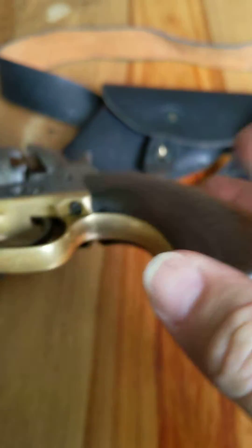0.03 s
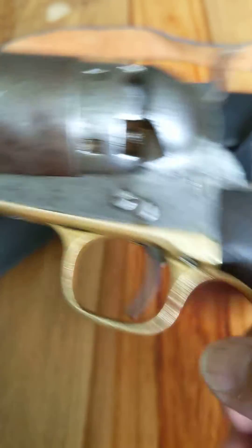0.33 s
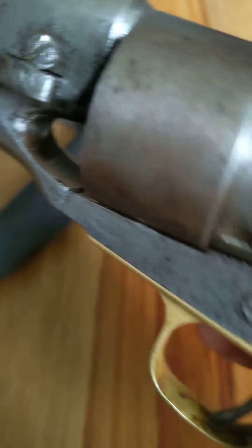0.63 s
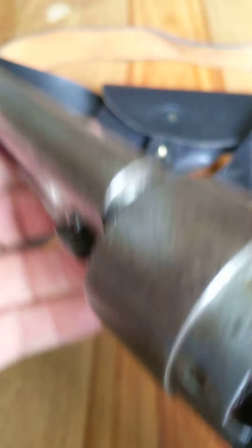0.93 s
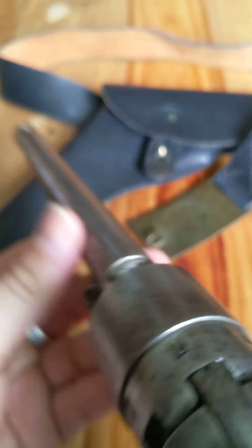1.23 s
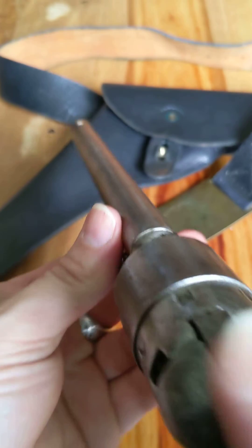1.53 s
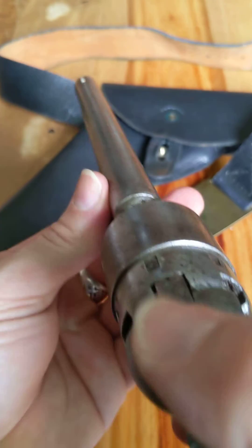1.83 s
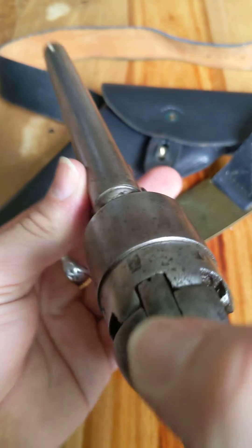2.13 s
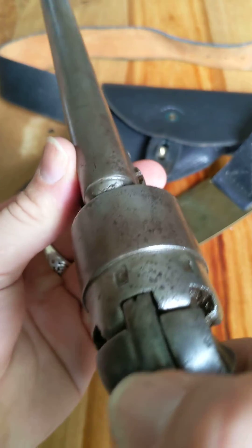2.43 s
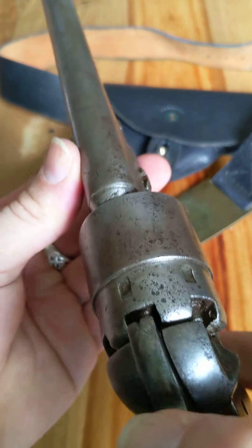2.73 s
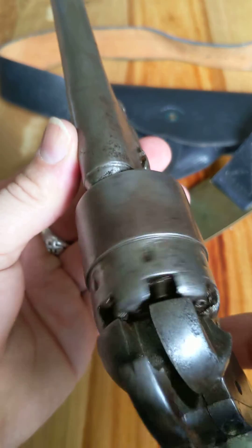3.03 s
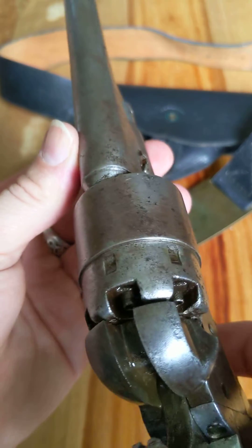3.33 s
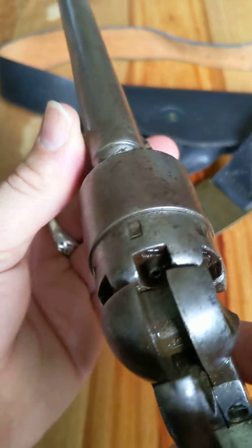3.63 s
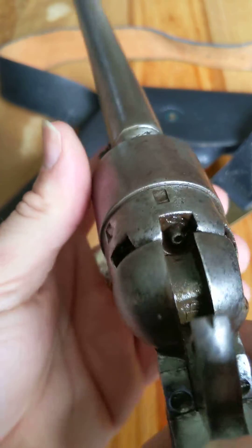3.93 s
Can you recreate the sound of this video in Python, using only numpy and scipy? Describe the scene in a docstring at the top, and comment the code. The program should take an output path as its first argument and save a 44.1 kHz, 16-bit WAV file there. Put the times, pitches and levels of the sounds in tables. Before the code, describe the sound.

Revolver hammer being cocked with sharp metallic clicks, after soft handling taps.

```python
"""A revolver handled in a small room, a hand's width from a phone's stereo microphone.
Over hum and hiss, skin slides on steel and fingers tap the frame. From 0.7 s a faint, far tick comes
once a second. Light clicks at 0.8 s and more taps follow as the gun is turned over. From about 3 s
it is cocked: the lock snaps through its notches, each contact ringing the hand-damped steel for a
few milliseconds, and the room answers."""
import sys
import numpy as np
from scipy import signal
from scipy.fft import rfft, irfft
from scipy.io import wavfile

SR = 44100
rng = np.random.default_rng(int(sys.argv[2]) if len(sys.argv) > 2 else 0)


def transcribe(signal):
    """Save signal, clipped to [-1, 1], as a 16-bit WAV file at the path in sys.argv[1]."""
    frames = np.atleast_2d(signal).T
    limited = np.clip(frames, -1, 1)
    pcm = np.round(limited * 32767).astype(np.int16)
    wavfile.write(sys.argv[1], SR, pcm)


N = 176400

# room rumble and microphone hiss (frequency [Hz], relative level [dB])
FLOOR_COLOUR = [(12, -38.5), (20, 1.5), (42, -9), (74, -7.5), (153, -13), (185, -14.5), (245, -18.5),
                (274, -15.5), (362, -20), (393, -24), (439, -18), (958, -22.5), (2400, -26.5), (2920, -27),
                (15500, -40)]
# hum in the room (frequency [Hz], level [dB])
HUM_TONES = [(71, -78), (238, -82)]
# skin sliding on steel (time [s], level [dB])
SLIDE_LEVELS = [(0, -83.5), (.24, -75), (.39, -65), (.43, -67), (.47, -59.5), (.5, -70), (.56, -60),
                (.62, -67.5), (.68, -61.5), (.73, -69), (.9, -59.5), (.99, -67.5), (1.15, -66.5),
                (1.4, -70), (1.6, -69), (2.0, -76.5), (2.18, -73), (2.7, -77.5), (4, -75)]
# its spectrum (frequency [Hz], relative level [dB])
SLIDE_COLOUR = [(300, -13.5), (1200, -9.5), (3000, -3.5), (5000, -4), (7500, -10.5), (10500, -1),
                (14500, -1.5), (16000, -9)]
# the palm shifting on the grip (peak time [s], length [s], centre [Hz], level [dB])
PALM_SHIFTS = [(0.38, 0.14, 2400, -73.5), (.615, 0.04, 270, -65.5), (0.891, 0.17, 2030, -69),
               (1.11, 0.19, 15, -55.5), (1.28, 0.1, 22, -61.5), (2.926, 0.17, 370, -76)]
# a dull knock on the held gun (frequency [Hz], relative level [dB], t60 [s])
KNOCK_MODES = [(360, 1.5, 0.011), (606, -3.5, .007), (1400, -4.5, 0.0038), (1940, 1, 0.004)]
# limits of the four tap bands (frequency [Hz])
TAP_EDGES_HZ = [100, 700, 1900, 3300, 7500]
# fingers on frame and grip (time [s], 4 band levels before trim [dB], pan left [dB], left lag [s])
FINGER_TAPS = [(0.0231, -69, -72.5, -78, -80, 2, 0), (0.038, -59, -114, -91.5, -90, -2, 0),
               (1.1408, -50.5, -53, -59.5, -69, -9, 0.000021), (1.2263, -59.5, -55, -66, -81, -3, .0004),
               (1.2664, -60, -54.5, -68.5, -77, -4, .0004), (1.282, -62.5, -59.5, -69.5, -75, -7, .0004),
               (1.353, -59.5, -56, -64, -84, -4, .0004), (2.373, -77, -82, -68, -80, -5, 0),
               (3.179, -65, -48, -50.5, -62, 7.5, -.0002)]
# spectrum of the room's tail (frequency [Hz], gain [dB])
ROOM_COLOUR = [(150, -3), (1200, -0.5), (2000, -4), (2700, 2.5), (3500, -4.5), (4700, -2.5), (7000, -7),
               (11000, -5), (16000, -13.5)]
# first reflections off table and body (delay [s], gain [dB])
REFLECTIONS = [(.0095, -22.5), (0.0179, -23.5)]
# resonances of the far tick (frequency [Hz], width [Hz], relative level [dB])
TICK_MODES = [(948, 90, -2.5), (1400, 320, -0.5), (2800, 1300, -3.5)]
# limits of the seven click bands (frequency [Hz])
CLICK_EDGES_HZ = [100, 700, 1900, 3300, 5300, 7500, 11000, 16000]
# metal contacts in the lock
# (time [s], 7 band levels before trim [dB], pan left [dB], left lag [s], favoured mode [Hz])
LOCK_CONTACTS = [(0.7709, -73, -69, -68.5, -60.5, -71, -70, -72, -6, -0.0024, 3850),
                 (0.8098, -75, -60, -59, -65, -57, -63, -67, -13, .0002, 5890),
                 (0.8178, -60.5, -56, -51.5, -47, -46, -45.5, -48.5, 0, 0.000024, 6500),
                 (2.2965, -91, -86, -104, -81.5, -82, -71.5, -73, -8, 0, 11400),
                 (2.9778, -84, -86, -72, -71.5, -65.5, -64.5, -73, -4.5, 0, 6770),
                 (3.0786, -55, -39.5, -34, -25.5, -33, -26.5, -21, -1.5, -.0003, 4650),
                 (3.268, -50.5, -49.5, -33, -31.5, -30.5, -20.5, -22, -7, -.0001, 2820),
                 (3.333, -48, -43, -32.5, -33, -26.5, -30, -23, -4.5, .0002, 2310),
                 (3.381, -57.5, -57.5, -49, -40, -54, -45, -46.5, -2.5, .0001, 4510),
                 (3.5762, -50, -55, -46, -36.5, -36.5, -31, -37.5, -3.5, .0001, 8060)]
# the hand-damped steel (frequency [Hz], relative level [dB], t60 [s])
STEEL_MODES = [(1080, -0.5, .011), (2310, -10, 0.02), (2820, -13, 0.016), (3850, -12.5, 0.0076),
               (4510, -1.5, 0.0093), (5110, 4.5, .009), (5890, 0.5, .014), (6770, -6, 0.012),
               (8270, -0.5, 0.0077), (9420, 7, 0.0073), (10170, 13.5, 0.0068), (11420, 7, 0.0083),
               (11940, 1, 0.0061), (12600, -6, 0.0095), (15500, -4, .011)]
# how the two microphone ports hear the steel (frequency [Hz], extra pan left [dB])
PORT_TILT = [(200, 9), (1200, 2.5), (2500, 8.5), (5500, 6), (8500, 3), (12000, -1), (16000, -3.5)]


def undb(db):
    """Decibels to gain."""
    return 10 ** (np.asarray(db) / 20)


def unit(x):
    """Scale to rms 1."""
    return x / np.sqrt(np.mean(x ** 2, axis=-1, keepdims=True) + 1e-30)


def decay(t, t60):
    """Fall by 60 dB in t60 seconds."""
    return np.exp(-np.log(1000) * t / t60)


def pan(db):
    """Stereo gains of constant total power, the left db above the right."""
    gains = undb(np.array([np.atleast_1d(db), -np.atleast_1d(db)]) / 2)
    return gains / np.sqrt(np.mean(gains ** 2, axis=0))


def freqs(size):
    """Bin frequencies in Hz, at least 1."""
    return np.maximum(np.arange(size // 2 + 1) * SR / size, 1)


def along(hz, points):
    """Read (Hz, value) points on a log-frequency axis."""
    f, values = np.array(points, float).T
    return np.interp(np.log(hz), np.log(f), values)


def colour(x, points):
    """Filter by (Hz, dB) points."""
    size = x.shape[-1]
    return irfft(rfft(x) * undb(along(freqs(size), points)), size)


def noise_band(hz, width):
    """Stereo noise in one steep resonance."""
    f = freqs(N)
    noise = rfft(rng.standard_normal((2, N)))
    return unit(irfft(noise / (1 + ((f * f - hz * hz) / (f * width)) ** 2), N))


def drift(rate_hz):
    """Smooth random wander of rms 1."""
    return unit(irfft(rfft(rng.standard_normal(N)) / (1 + (freqs(N) / rate_hz) ** 4), N))


def shape_bands(x, edges, band_db):
    """Bring a blow near its band levels, taken over 10 ms, and roll off the bass."""
    size = x.shape[-1]
    f, spectrum = freqs(size), rfft(x)
    centres = np.sqrt(np.array(edges[:-1]) * np.array(edges[1:]))
    bands = [(f >= low) & (f < high) for low, high in zip(edges, edges[1:])]
    for _ in range(2):
        power = np.mean(abs(spectrum) ** 2, axis=0)
        energy = np.array([2 * power[band].sum() / size for band in bands])
        band_rms = np.sqrt(energy / (SR / 100))
        cepstrum = irfft(np.interp(np.log(f), np.log(centres), np.log(undb(band_db) / band_rms)))
        cepstrum[1:size // 2] *= 2  # minimum phase: nothing rings ahead of the blow
        cepstrum[size // 2 + 1:] = 0
        spectrum = spectrum * np.exp(rfft(cepstrum)) / (1 + edges[0] / (2j * f))
    return irfft(spectrum)


def at_microphone(x, lag, pan_db):
    """A close sound reaches the two ports at different times and levels."""
    delay = np.exp(1j * np.pi * freqs(x.shape[-1]) * lag * np.array([[-1], [1]]))
    return irfft(rfft(x) * pan(pan_db) * delay)


def add(out, x, start):
    """Mix a short sound in at start seconds."""
    i = int(round(start * SR))
    a, b = max(i, 0), min(i + x.shape[-1], N)
    out[:, a:b] += x[:, a - i:b - i]


def room_tone(floor_db=-68.5, shared_below_hz=450):
    """Rumble largely common to both ports, separate microphone hiss and a wavering hum."""
    t = np.arange(N) / SR
    shared = 0.78 / (1 + (freqs(N) / shared_below_hz) ** 2)
    common = rfft(rng.standard_normal(N)) * np.sqrt(shared)
    separate = rfft(rng.standard_normal((2, N))) * np.sqrt(1 - shared)
    out = unit(colour(irfft(common + separate, N), FLOOR_COLOUR)) * undb(floor_db)
    for hz, db in HUM_TONES:
        tone = np.sin(2 * np.pi * hz * t + 2.2 * drift(1.3))
        out += undb(db) * unit(tone * undb(3.9 * drift(4)))
    return out


def sliding_hands(grain_db=1, pan_db=-5):
    """Close up and to the right, skin hisses over steel; the palm shifts in soft swells."""
    t = np.arange(N) / SR
    slide_db = np.interp(t, *np.array(SLIDE_LEVELS).T) + grain_db * drift(40)
    out = unit(colour(rng.standard_normal((2, N)), SLIDE_COLOUR)) * undb(slide_db) * pan(pan_db)
    for middle, length, hz, db in PALM_SHIFTS:
        swell = np.exp(-2 * ((t - middle) / length) ** 2)
        out += noise_band(hz, hz * 0.77) * undb(db) * swell
    return out


def finger_taps(thud_rise_s=0.00082, trim_db=-2.5, size=4096, lead=128):
    """A fingertip rings a few quickly damped modes; the low thud builds last."""
    out = np.zeros((2, N))
    age = np.maximum(np.arange(size) - lead, 0) / SR
    knock = 0
    for hz, db, t60 in KNOCK_MODES:
        rise_s = thud_rise_s * KNOCK_MODES[0][0] / hz
        build = 1 - np.exp(-age / rise_s)
        knock += undb(db) * build * np.sin(2 * np.pi * hz * age) * decay(age, t60)
    for start, *band_db, pan_db, lag in FINGER_TAPS:
        tap = at_microphone(knock, lag, pan_db)
        tap = shape_bands(tap, TAP_EDGES_HZ, np.array(band_db) + trim_db)
        add(out, tap, start - lead / SR)
    return out


def small_room(x, low_t60=0.33, treble_t60=0.24, gap_s=0.007, build_s=0.0024, size=32768):
    """Two near reflections and a diffuse tail whose treble dies first."""
    t, f = np.arange(size) / SR, freqs(size)
    noise = rfft(rng.standard_normal((2, 2, size)))  # each side of the gun feeds both ports
    centres_hz = np.geomspace(2000, 12000, 4)
    tail = 0
    for weights, t60 in zip(np.eye(4), np.geomspace(low_t60, treble_t60, 4)):
        tail += irfft(noise * np.interp(f, centres_hz, weights)) * decay(t, t60)
    build = 1 - np.exp(-np.maximum(t - gap_s, 0) / build_s)
    response = colour(unit(tail * build), ROOM_COLOUR) * undb(-12) / np.sqrt(2 * size)
    for delay, db in REFLECTIONS:
        response[:, :, int(delay * SR)] += undb(db) * np.eye(2)
    return signal.oaconvolve(x[None], response, axes=2).sum(axis=1)[:, :N]


def far_tick(first_s=0.738, period_s=1.0, rise_s=0.039, fall_s=0.017):
    """A tick far off microphone, likely a clock, blurred by the room."""
    age = (np.arange(N) / SR - first_s) % period_s
    ring = unit(sum(undb(db) * noise_band(hz, width) for hz, width, db in TICK_MODES))
    return ring * undb(-50) * (1 - np.exp(-age / rise_s)) * np.exp(-age / fall_s)


def steel_ring(t, scatter_db=3.5):
    """The gun's modes ring with a chance strength and phase at each blow."""
    hz, db, t60 = np.array(STEEL_MODES).T[:, :, None]
    shape = (2, len(STEEL_MODES), 1)
    strength = undb(db + scatter_db * rng.standard_normal(shape))
    phase = rng.uniform(0, 2 * np.pi, shape)
    return unit(np.sum(strength * np.sin(2 * np.pi * hz * t + phase) * decay(t, t60), axis=1))


def dry_crack(t, fall_s=0.0013):
    """The pitchless part of a click: a noise burst with its spectrum flattened."""
    burst = rng.standard_normal((2, len(t))) * np.exp(-t / fall_s)
    flat = irfft(np.exp(1j * np.angle(rfft(burst))))
    return unit(flat * np.exp(-t / (10 * fall_s)))


def lock_clicks(crack_db, snap_db, favoured_db, trim_db=-0.5, size=4096, lead=256):
    """Each contact scrapes and snaps, cracks and rings the steel, with one mode lifted."""
    scrape_rise_s, scrape_fall_s, favoured_width_hz = 0.00046, 0.00083, 410
    out, t, f = np.zeros((2, N)), np.arange(size) / SR, freqs(size)
    since_snap = t - lead / SR
    age = np.maximum(since_snap, 0)
    scrape_shape = np.exp(-np.maximum(since_snap / scrape_fall_s, -since_snap / scrape_rise_s))
    snap = undb(snap_db) * unit(signal.unit_impulse(size, lead))
    jolt = np.sin(2 * np.pi * 130 * age) * decay(age, t60=0.032)  # the whole gun jolts in the hand
    for start, *band_db, pan_db, lag, favoured_hz in LOCK_CONTACTS:
        scrape = unit(rng.standard_normal((2, size)) * scrape_shape)
        steel = steel_ring(t) + undb(crack_db) * dry_crack(t)
        detuning = (f * f - favoured_hz ** 2) / (f * favoured_width_hz)
        lift = 1 + (undb(favoured_db) - 1) / (1 + 1j * detuning)
        click = unit(irfft(rfft(scrape + snap) * rfft(steel) * lift))
        click = at_microphone(click, lag, pan_db + along(f, PORT_TILT))
        click = shape_bands(click, CLICK_EDGES_HZ, np.array(band_db) + trim_db)
        thump = undb(band_db[0] + 2) * jolt  # follows the lowest band
        add(out, click + thump, start - lead / SR)
    return out


def scene():
    """The gun close to the microphone, the room around it and the quiet behind."""
    taps = finger_taps()
    direct = lock_clicks(crack_db=0, snap_db=1.5, favoured_db=9) + taps
    # sound leaving in all directions blends the modes, so the room gets mostly crack
    all_round = lock_clicks(crack_db=10, snap_db=2.5, favoured_db=2.5) + taps
    return direct + small_room(all_round) + sliding_hands() + far_tick() + room_tone()


def record(dry):
    """The loudest click peaks are softly rounded, and the top treble is cut."""
    ceiling, top_hz = 0.8, 15900
    rounded = ceiling * np.tanh(dry / ceiling)
    return signal.sosfilt(signal.ellip(8, .2, 70, top_hz, fs=SR, output="sos"), rounded)


dry = scene()
out = record(dry)
transcribe(out)
```